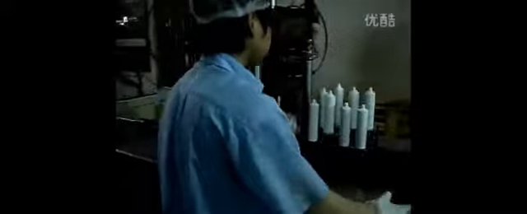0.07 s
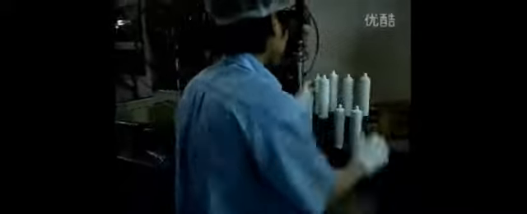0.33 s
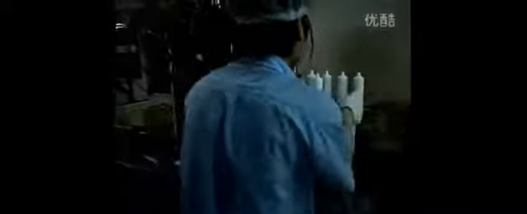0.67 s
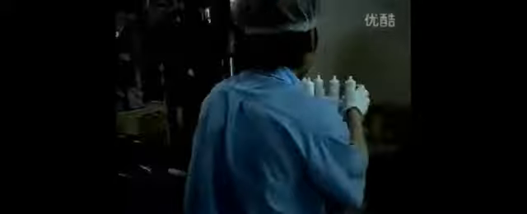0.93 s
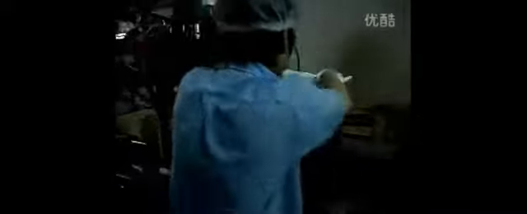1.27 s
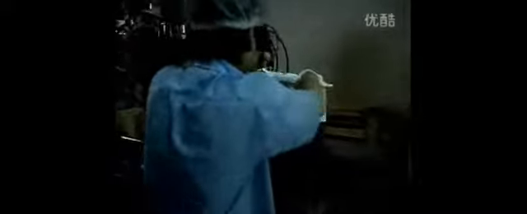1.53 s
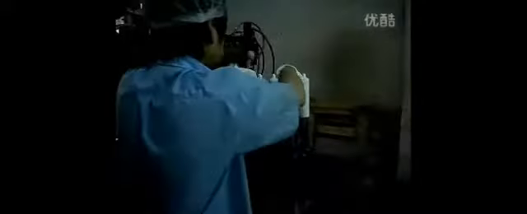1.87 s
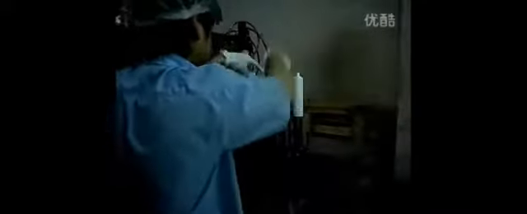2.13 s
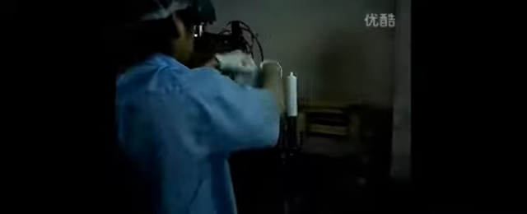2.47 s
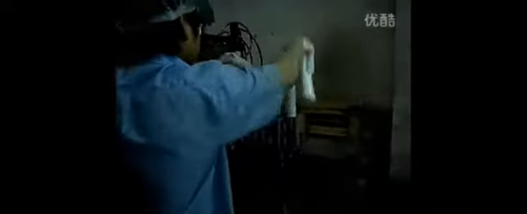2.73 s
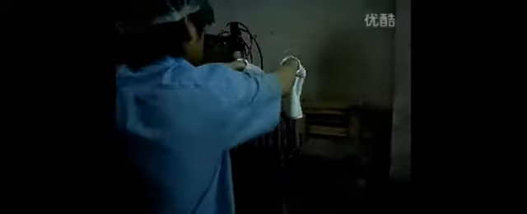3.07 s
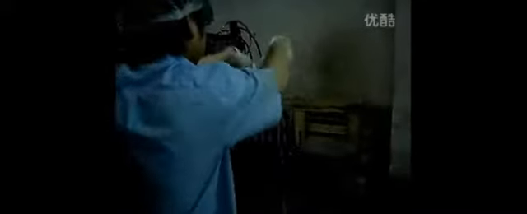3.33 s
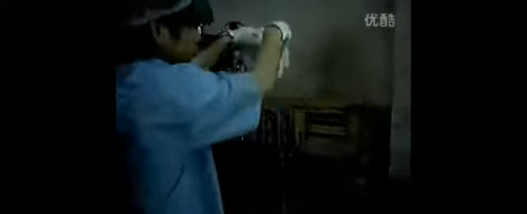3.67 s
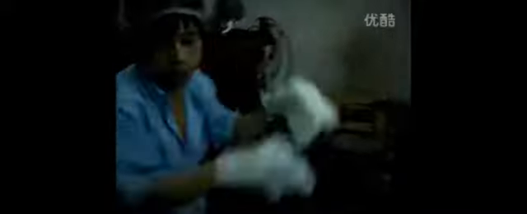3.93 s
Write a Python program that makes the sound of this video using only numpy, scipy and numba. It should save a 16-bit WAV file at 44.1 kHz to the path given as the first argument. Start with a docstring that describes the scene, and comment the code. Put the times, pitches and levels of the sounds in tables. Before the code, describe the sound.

Dense machine noise in a factory hall, with close knocks and clinks of handled tubes.

```python
"""A loud factory hall, with one microphone close to a worker handling thin metal tubes at a machine.
All around, machines roar and clatter and motors hum. Up close, parts hit their stops and knock on the
bench, struck tubes clink and rattle, and later a hollow part judders; the hall echoes each of these.
A narrow-band recorder ducks the roar after every loud knock and clips the sharpest peaks."""
import sys
import numpy as np
from scipy import signal
from scipy.fft import rfft, irfft
from scipy.io import wavfile
from numba import njit

SR = 44100
rng = np.random.default_rng(int(sys.argv[2]) if len(sys.argv) > 2 else 0)


def store_wav(level_fs):
    """Save 16-bit WAV to argv[1]."""
    pcm = np.round(np.clip(np.atleast_2d(level_fs), -1, 1) * 32767)
    wavfile.write(sys.argv[1], SR, pcm.T.astype(np.int16))


N = 176400

TICK_RISE_S, TICK_HZ = .0008, 2600  # a tube's first touch on metal


def undb(db):
    """Decibels to gain."""
    return 10 ** (np.asarray(db) / 20)


def unit(x):
    """Scale to an rms of one."""
    return x / (np.sqrt(np.mean(x ** 2)) + 1e-12)


def clock(length_s):
    """Sample times over a span."""
    return np.arange(int(length_s * SR)) / SR


def add(out, start_s, x):
    """Mix a sound in at its time."""
    i = int(start_s * SR)
    out[i:i + len(x)] += x[:len(out) - i]


def walk(rate):
    """A random wander of unit rms that turns `rate` times a second."""
    return unit(np.interp(np.arange(N) / SR * rate, np.arange(256), rng.standard_normal(256)))


def noise_band(length, hz, width):
    """Noise through the same resonance twice; the width is a share of its centre."""
    b, a = signal.iirpeak(hz, 1 / width, fs=SR)
    return signal.lfilter(b, a, signal.lfilter(b, a, rng.standard_normal(length)))


def colour(x, points):
    """Shape a sound by (frequency [Hz], level [dB]) points."""
    hz, db = np.array(points).T
    f = np.maximum(np.fft.rfftfreq(N, 1 / SR), 1)
    return irfft(rfft(x) * undb(np.interp(np.log(f), np.log(hz), db)), N)


def roar():
    """Machines across the hall blur into a roar whose bands flicker, with a dense clatter inside it."""
    # spectrum of the hall at the microphone (frequency [Hz], relative density [dB])
    spectrum = [(25, -25), (55, -35), (85, -21), (125, -10.5), (220, -5), (400, -0.53), (540, -2.2),
                (780, -1), (1150, -4), (1500, -10), (1850, -11), (2150, -8.5), (2700, -9.5), (3300, -14),
                (3900, -19.5), (4400, -29.5), (5000, -33)]
    # rise and fall either side of the crossover (time [s], bass level [dB], treble level [dB])
    levels = [(0, -0.5, -2.5), (.24, 2, 1), (.32, -3.5, 2.5), (.46, 6.5, 0.5), (.52, -10, -3.5),
              (.58, -4.5, -5.5), (.66, 1, -0.5), (1.0, -2.5, -3), (1.25, 5.5, 1), (1.6, 0.5, -.5),
              (1.9, 0.5, 1.5), (2.3, -0.8, -1.4), (2.599, 0.5, 1), (2.819, -0.5, 0.3), (3.12, 0.3, -1.5),
              (3.26, 3.5, 3.5), (3.7, 0.6, -0.1), (4, -3.5, -3.5)]
    roar_db, flicker_db, swell_db, crossover_hz = -20.5, 1.4, 1.66, 600
    clatter_db, taps_per_s, tap_decay_s = -28, 200, .006
    t, f = np.arange(N) / SR, np.fft.rfftfreq(N, 1 / SR)
    noise = rfft(rng.standard_normal(N))
    edges_hz = [0, 150, 300, 500, 800, 1300, 2000, 3000, SR]
    bands = [irfft(noise * ((f >= lo) & (f < hi)), N) for lo, hi in zip(edges_hz, edges_hz[1:])]
    rush = sum(band * undb(flicker_db * walk(22.2)) for band in bands)
    onsets = rng.random(N) < taps_per_s / SR
    tap_db = -3 * np.minimum(rng.exponential(size=N), 4)
    taps = onsets * undb(tap_db) * rng.choice([-1, 1], N)
    age = clock(.05)
    burst = rng.standard_normal(len(age)) * np.exp(-age / tap_decay_s)
    clatter = signal.fftconvolve(taps, burst)[:N]
    din = undb(roar_db) * unit(colour(rush, spectrum))
    din += undb(clatter_db) * unit(colour(clatter, spectrum))
    din *= undb(swell_db * walk(4.492))
    bass = irfft(rfft(din) / (1 + (f / crossover_hz) ** 4), N)
    treble = din - bass
    times, bass_db, treble_db = np.array(levels).T
    return bass * undb(np.interp(t, times, bass_db)) + treble * undb(np.interp(t, times, treble_db))


def motors():
    """Motors hum and whine in the background, wavering in level and pitch; the low hum swells."""
    # motor tones (frequency [Hz], level [dB], waver [0-1], share of the swell [0-1])
    tones = [(197, -38, .45, .5), (299.5, -37.5, .3, 0), (391, -31.5, .25, 1), (1502, -52, .25, 0),
             (1601, -45, .2, 0), (1732, -39.5, .2, 0)]
    # swell of the low hum (time [s], level [dB])
    swell = [(0, -6.5), (1.0, -5), (1.3, 4.5), (1.55, 6), (1.85, -6), (2.4, -16.5), (2.53, 10), (2.7, 1),
             (3.1, 3.5), (4, -2)]
    drift_hz = 1.2
    out = np.zeros(N)
    swell_db = np.interp(np.arange(N) / SR, *np.array(swell).T)
    for hz, db, waver, share in tones:
        phase = 2 * np.pi * np.cumsum(hz + drift_hz * walk(4)) / SR
        tone = np.sin(phase) * (1 + waver * walk(8.3)) + waver * np.cos(phase) * walk(13)
        out += undb(db + share * swell_db) * unit(tone)
    return out


def tap(hz, rise_s):
    """A hard contact: a few swings that peak quickly and die."""
    t = clock(.03)
    envelope = (t / rise_s * np.exp(1 - t / rise_s)) ** 3
    return envelope * np.cos(2 * np.pi * hz * (t - rise_s))


def clacks():
    """Close by, parts hit their stops and hardly ring."""
    # hits on the stops (time [s], peak level [dB], frequency [Hz], rise [s])
    hits = [(.215, -9, 450, .0025), (.2203, -10, 380, .0024), (.2414, 0, 1050, .0013),
            (.2465, -1, 900, .0032), (1.1938, -3, 520, .0017)]
    out = np.zeros(N)
    for start, db, hz, rise in hits:
        add(out, start, undb(db) * tap(hz, rise))
    return out


def knocks():
    """Each blow on the bench or machine shakes a crowd of damped modes around its own centre."""
    # dull blows near the microphone (time [s], level [dB], centre [Hz], decay [s])
    blows = [(.222, -12.5, 242, 0.014), (.2412, -1.5, 960, 0.023), (.469, -24.5, 594, 0.0099),
             (.917, -18.5, 740, 0.036), (1.075, -33, 190, .03), (1.448, -15, 375, 0.013),
             (1.498, -18, 900, 0.009), (1.66, -20.5, 207, 0.017), (2.122, -18.5, 877, 0.028),
             (2.281, -17, 760, 0.014), (2.505, -14, 399, 0.093), (2.748, -17, 742, 0.088),
             (2.827, -16, 774, 0.0095), (3.481, -14, 790, 0.016)]
    rise_s = .00048
    out, t = np.zeros(N), clock(.3)
    for start, db, hz, decay in blows:
        body = noise_band(len(t), hz, width=.49)
        blow = unit(body * (1 - np.exp(-t / rise_s)) * np.exp(-t / decay))
        duty = decay / t[-1] / 2  # makes the level that of the onset, whatever the decay
        add(out, start, undb(db) * np.sqrt(duty) * blow)
    return out


def tube_ring(ring_scale, favoured_hz, focus_db_per_octave):
    """A slightly oval tube rings in beating pairs of modes; the point of contact favours some."""
    # modes of a thin tube (frequency [Hz], level [dB], time to fall 60 dB [s])
    modes = [(2228, -1, .18), (2326, -5, .06), (2460, -3, .09), (2560, -7, .08), (2798, -2, .16),
             (2880, -9, .07), (3042, -11, .07), (3230, -5, .16), (3890, -10, .14), (4100, -11, .14)]
    split_hz = 11  # either side of each mode
    t = clock(.4)
    beat = 2 * np.pi * split_hz * t
    out = np.zeros(len(t))
    for hz, db, t60 in modes:
        loss_db = focus_db_per_octave * abs(np.log2(hz / favoured_hz))
        detune, turn = rng.standard_normal(2)
        phase = 2 * np.pi * (hz + split_hz * detune / 2) * t + np.pi * turn
        pair = np.sin(phase - beat) + np.sin(phase + beat) / 2
        decay = np.exp(-np.log(1000) * t / (t60 * ring_scale))  # scale below 1: a gloved hand damps it
        out += undb(db - loss_db) * pair * decay
    return out * (1 - np.exp(-t / TICK_RISE_S / 2)) / 2


def clinks():
    """A tube strikes metal close by: a hard tick, then its ring."""
    # strikes (time [s], ring level [dB], ring time [x free ring], favoured mode [Hz], tick level [dB])
    strikes = [(0.2416, -5, 1.2, 2230, -7), (.2648, -0.5, 0.68, 2200, -27.5), (.279, 2, 0.48, 3900, -19),
               (.326, -9.5, 1.4, 2230, -30), (.405, -17, 1, 2190, -33.5), (1.0984, -29, .55, 3200, -18.5),
               (1.4977, -28, .47, 2400, -27), (1.816, -3.5, 1, 2390, -0.5), (1.829, -1.5, 0.98, 2820, -24),
               (1.848, -10, 1.1, 2720, -31), (2.6602, -12, .5, 2810, -1), (2.671, -9.5, 0.61, 2800, -25),
               (3.885, -18.5, 2, 2560, -27), (3.921, -18.5, 1.5, 2560, -30)]
    out = np.zeros(N)
    for start, ring_db, ring_scale, hz, tick_db in strikes:
        add(out, start, undb(ring_db) * tube_ring(ring_scale, hz, focus_db_per_octave=22))
        add(out, start, undb(tick_db) * tap(TICK_HZ, TICK_RISE_S))
    return out


def rattles():
    """Tubes jostle on their pegs: flurries of small contacts ring them as they scrape along."""
    # flurries (time [s], length [s], level [dB], favoured mode [Hz])
    flurries = [(0.249, 0.055, -19.5, 3700), (.287, 0.071, -20, 3050), (0.361, 0.11, -26.5, 2500),
                (0.475, .13, -25.5, 3140), (0.599, 0.19, -30.5, 2400), (0.825, 0.056, -25, 2700),
                (1.08, .033, -26.5, 3200), (1.488, .029, -27.5, 2500), (2.836, .037, -32, 2600)]
    contacts_per_s, scrape_db, rise_s = 400, -9, .015
    out, t = np.zeros(N), clock(.6)
    for start, length, db, hz in flurries:
        envelope = np.minimum(t / rise_s, 1) * np.clip(1 - t / length, 0, 1) ** .5
        onsets = rng.random(len(t)) < contacts_per_s / SR
        contacts = onsets * rng.choice([-1, 1], len(t)) * envelope
        tube = tube_ring(.8, hz, focus_db_per_octave=9)
        ring = unit(signal.fftconvolve(contacts, tube)[:len(t)])
        scrape = unit(noise_band(len(t), hz=2900, width=.45) * envelope)
        add(out, start, undb(db) * np.sqrt(length / t[-1]) * (ring + undb(scrape_db) * scrape))
    return out


def judders():
    """A hollow part judders against its seat: soft pushes ring one resonance."""
    # pushes (time [s], peak level [dB], frequency [Hz])
    pushes = [(3.171, -6, 705), (3.204, -17, 730), (3.2265, -2.5, 735), (3.27, -13, 725), (3.293, -9, 712),
              (3.342, -13, 745), (3.43, -15, 745)]
    rise_s, decay_s = .005, .0075
    out, t = np.zeros(N), clock(.2)
    envelope = (1 - np.exp(-t / rise_s)) ** 2 * np.exp(-t / decay_s)
    envelope /= envelope.max()
    for start, db, hz in pushes:
        add(out, start, undb(db) * envelope * np.sin(2 * np.pi * hz * t))
    return out


def hall_echo(near, t60_s, level_db):
    """The hall returns nearby sounds to the microphone as a diffuse, fading tail."""
    t = clock(1)
    tail = rng.standard_normal(len(t)) * np.exp(-np.log(1000) * t / t60_s)
    return undb(level_db) * signal.fftconvolve(near, tail / np.linalg.norm(tail))[:N]


@njit
def follow_peaks(x, attack_s, release_s):
    """The recorder's level detector rises fast and falls slowly."""
    out, level = np.empty(len(x)), 0.
    for i in range(len(x)):
        size = abs(x[i])
        level += (size - level) / (SR * (attack_s if size > level else release_s))
        out[i] = level
    return out


def scene():
    """At the microphone, in mono: close handling and its echo over the machines of the hall."""
    near = clinks() + rattles() + clacks() + knocks() + judders()
    return (near + hall_echo(near, t60_s=.55, level_db=-12) + roar() + motors())[None]


def record(dry):
    """The recorder's gain ducks after loud peaks; its band is narrow, and what overshoots is clipped."""
    threshold_db, ratio, clip_db = -12.3, 30, -6
    band_hz, low_cut_hz, soften_hz, top_hz = 4550, 46, 9400, 10000
    peak = follow_peaks(dry[0], attack_s=.0017, release_s=.095)
    gain = np.maximum(peak / undb(threshold_db), 1) ** (1 / ratio - 1)
    narrow = signal.sosfilt(signal.ellip(8, .3, 80, band_hz, fs=SR, output="sos"), dry * gain)
    thin = signal.sosfilt(signal.butter(1, low_cut_hz, "high", fs=SR, output="sos"), narrow)
    clipped = np.clip(thin, -undb(clip_db), undb(clip_db))
    soft = signal.sosfilt(signal.butter(2, soften_hz, fs=SR, output="sos"), clipped)
    return signal.sosfilt(signal.ellip(8, .2, 80, top_hz, fs=SR, output="sos"), soft)


dry = scene()
out = record(dry)
store_wav(out)
```